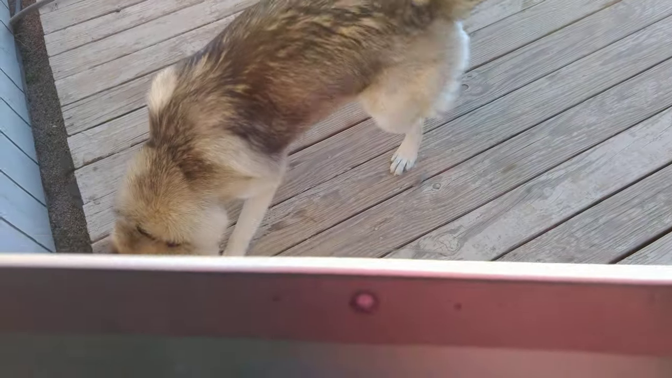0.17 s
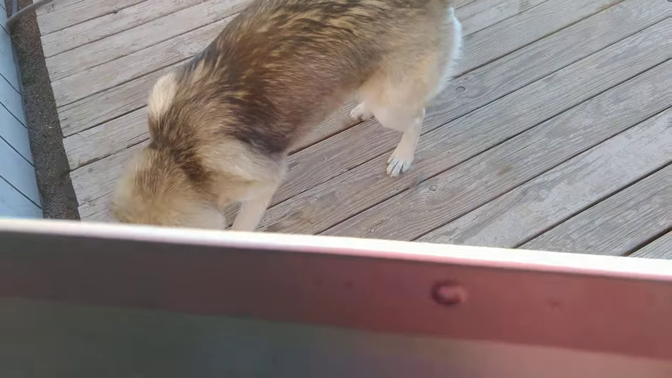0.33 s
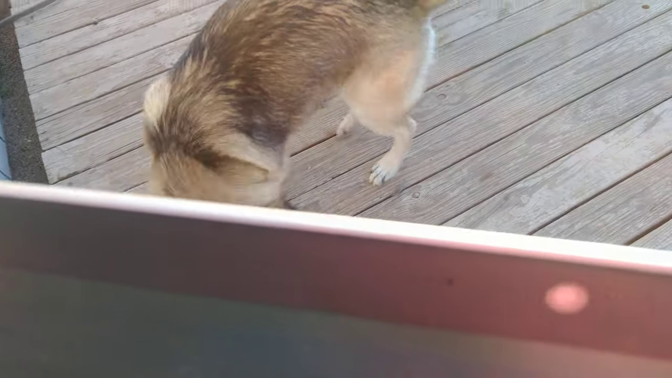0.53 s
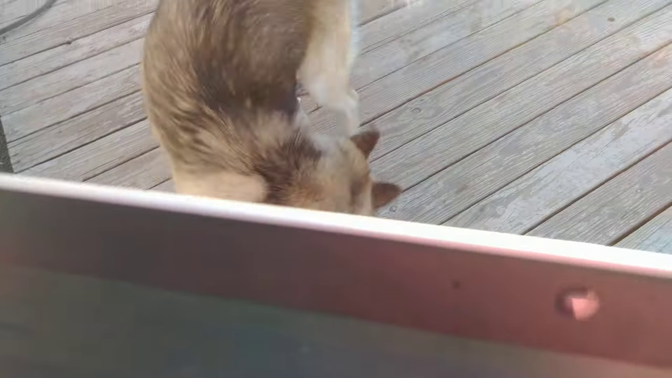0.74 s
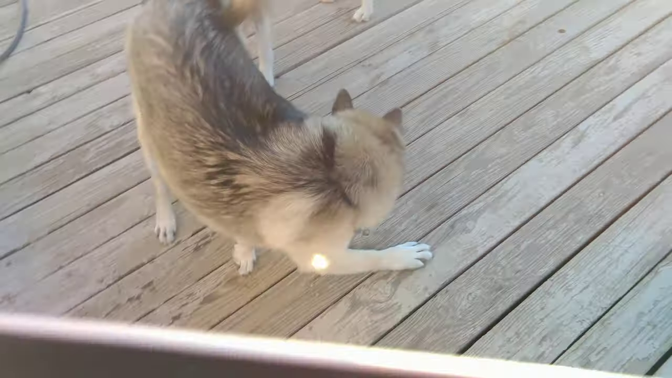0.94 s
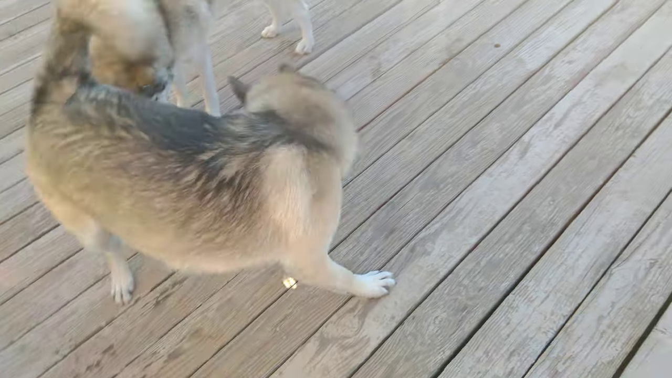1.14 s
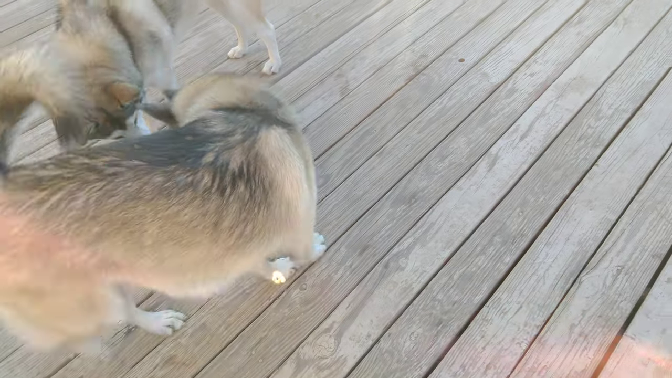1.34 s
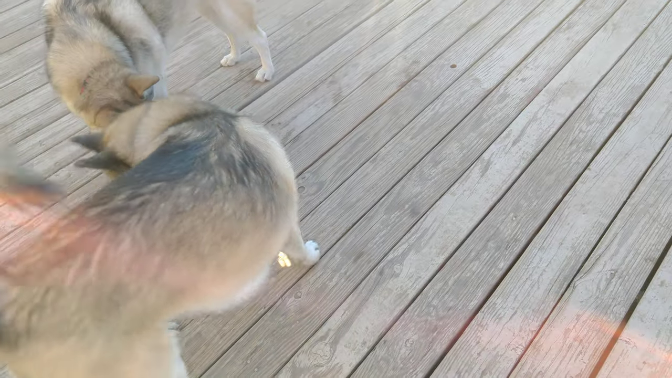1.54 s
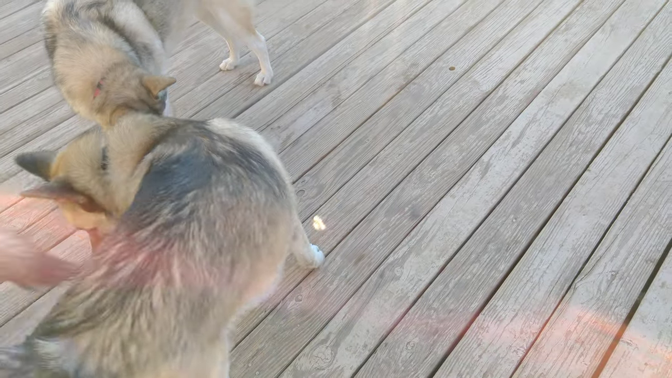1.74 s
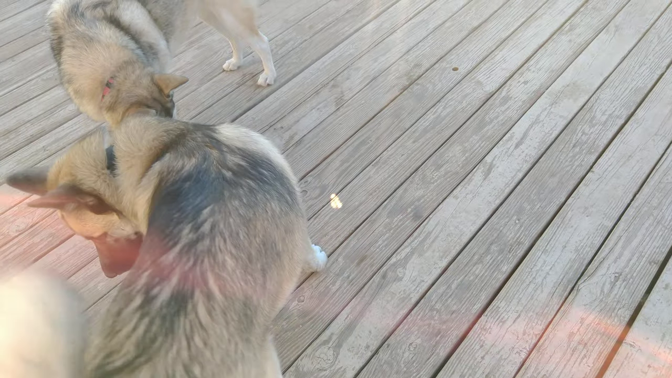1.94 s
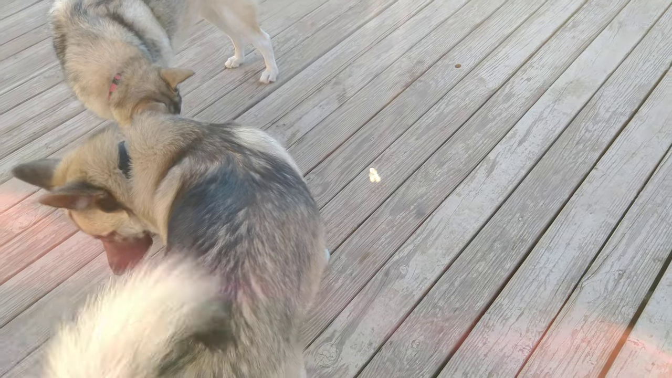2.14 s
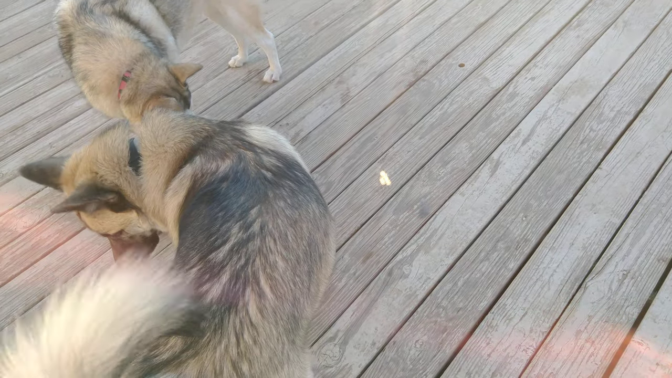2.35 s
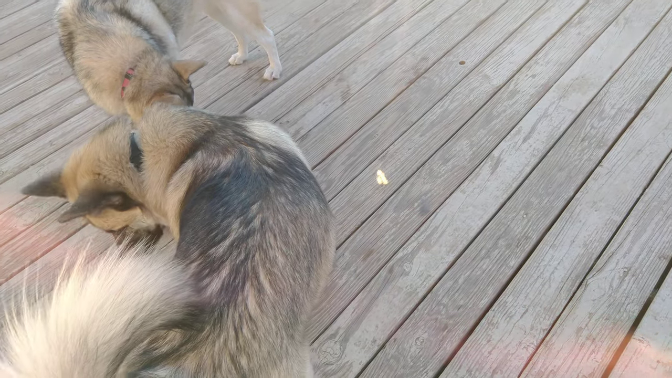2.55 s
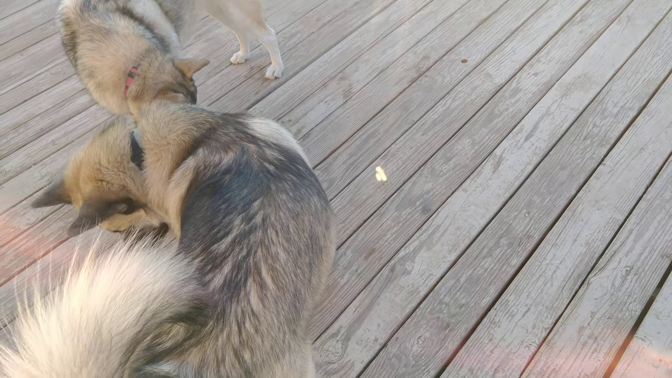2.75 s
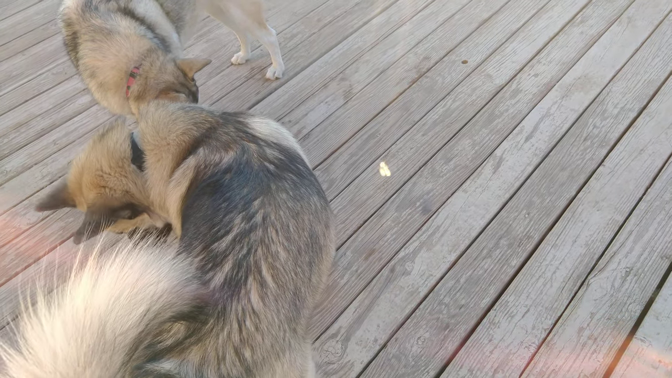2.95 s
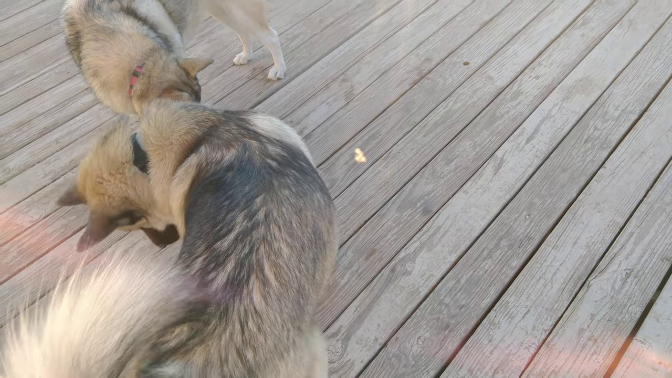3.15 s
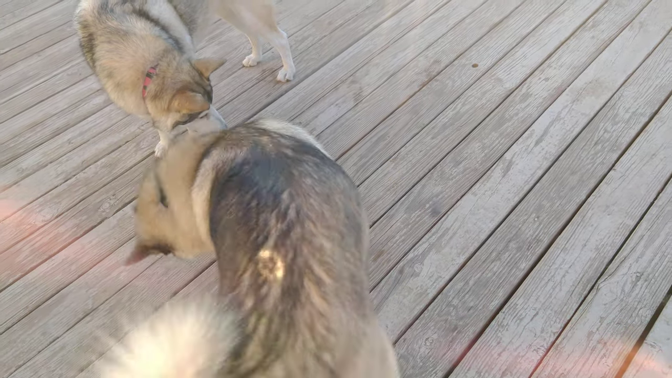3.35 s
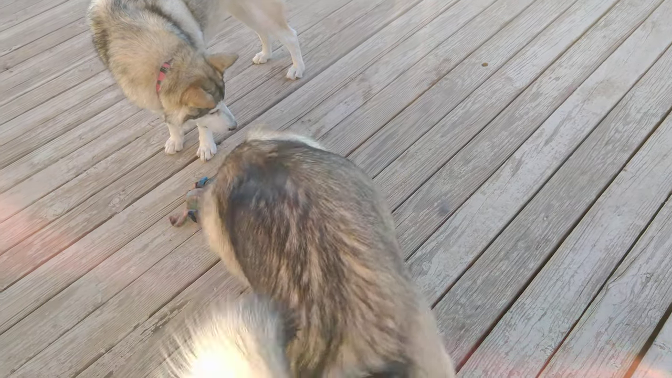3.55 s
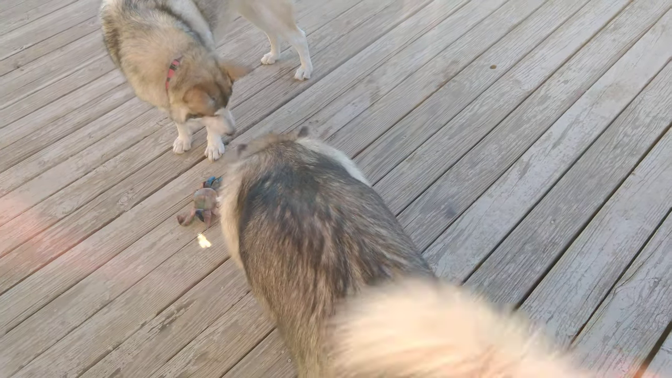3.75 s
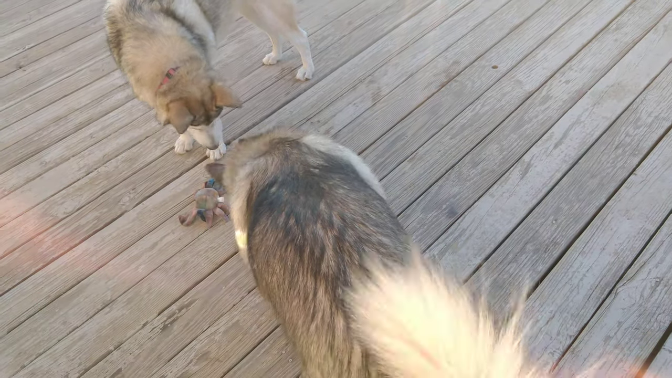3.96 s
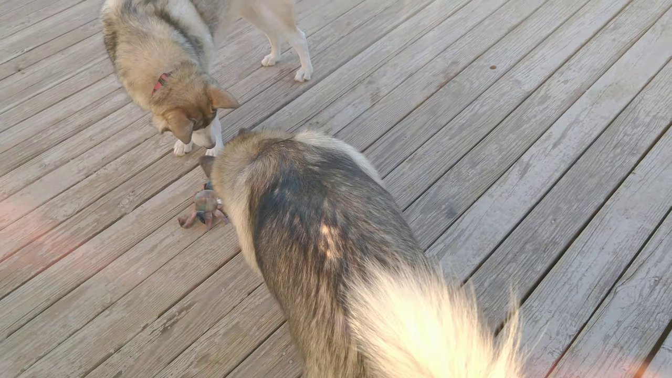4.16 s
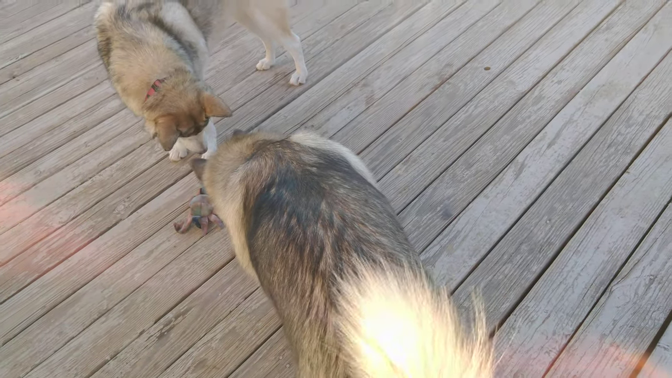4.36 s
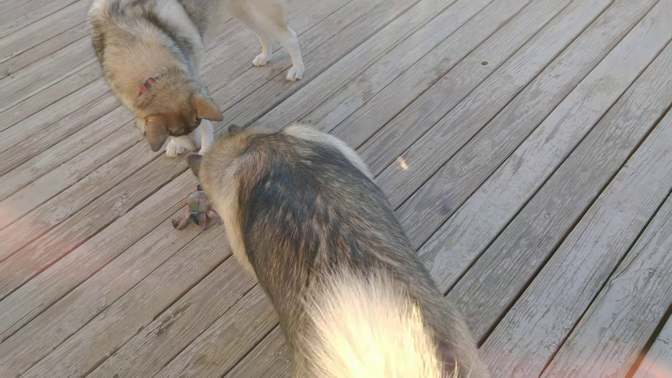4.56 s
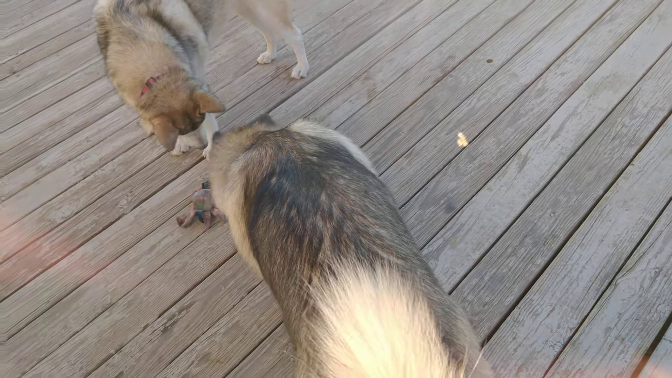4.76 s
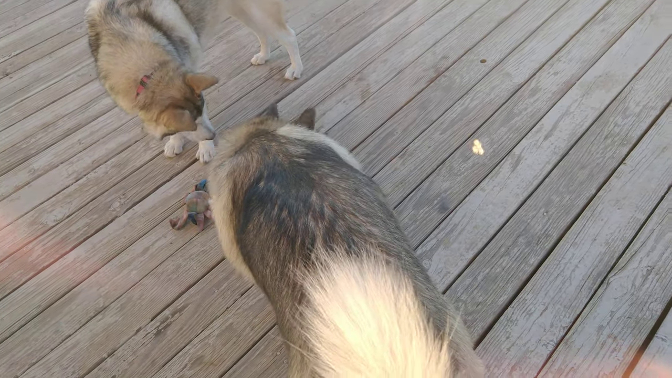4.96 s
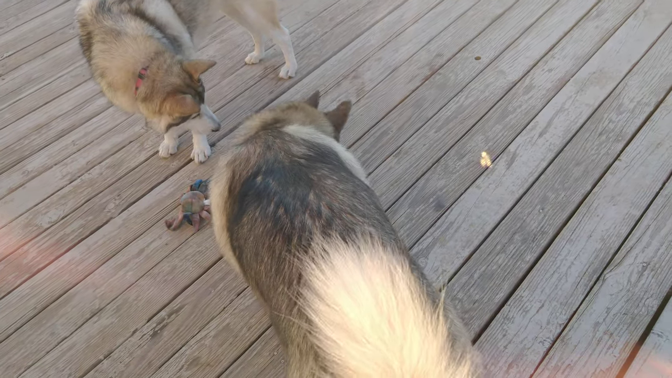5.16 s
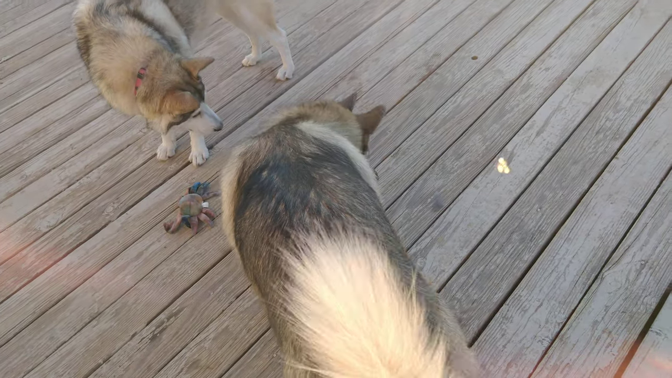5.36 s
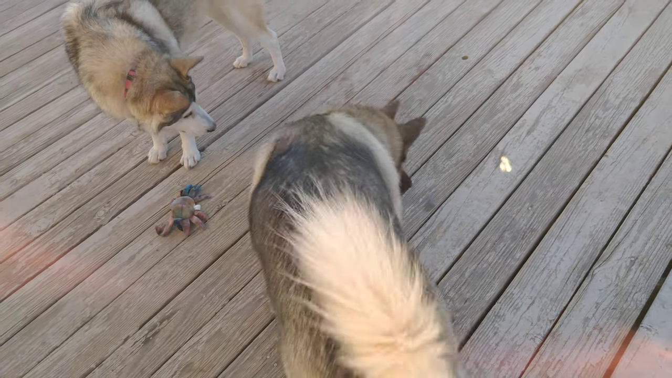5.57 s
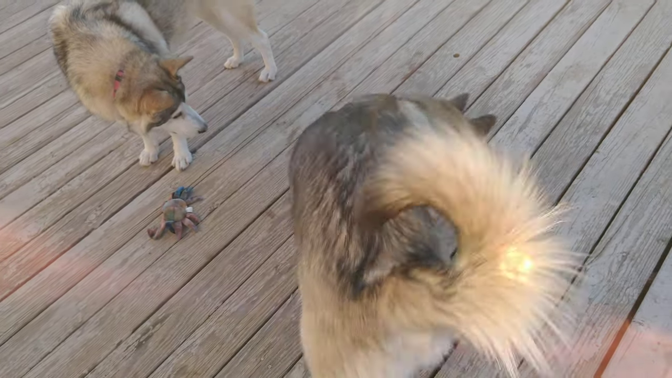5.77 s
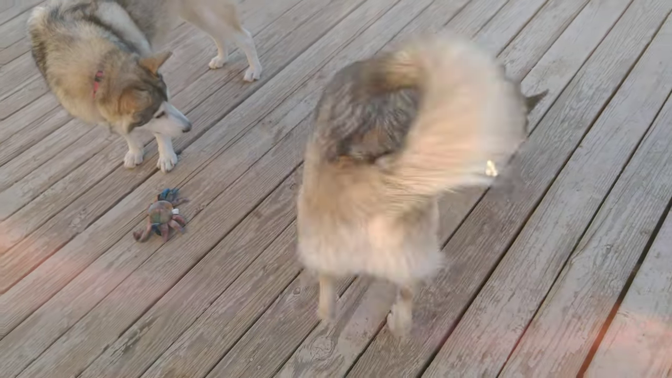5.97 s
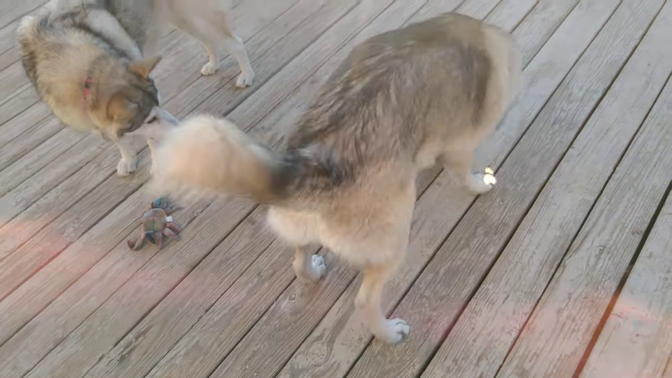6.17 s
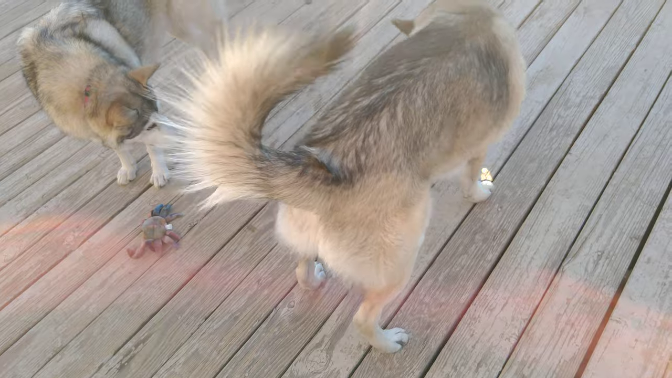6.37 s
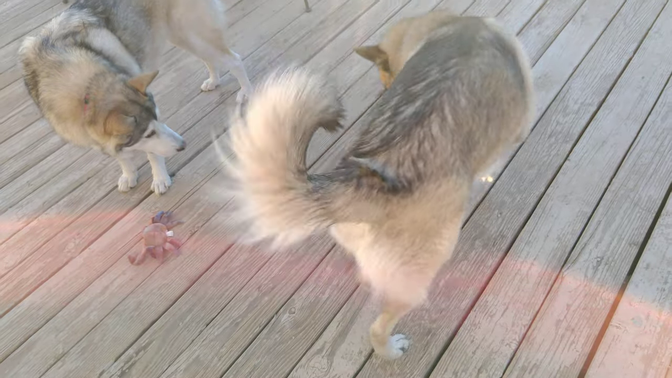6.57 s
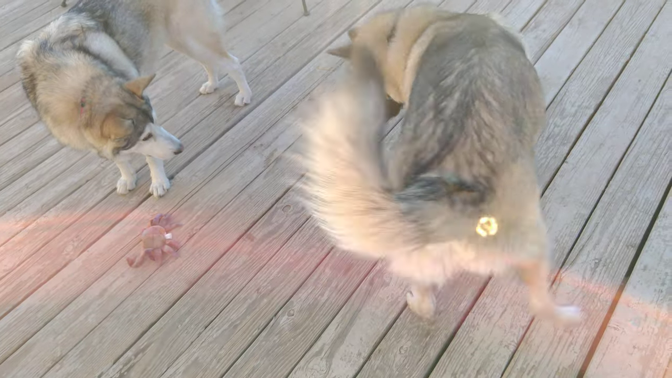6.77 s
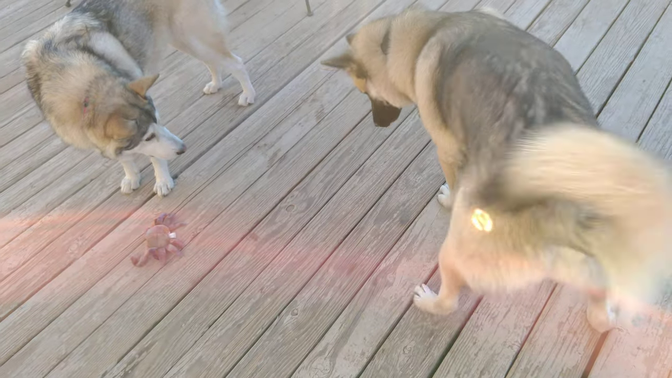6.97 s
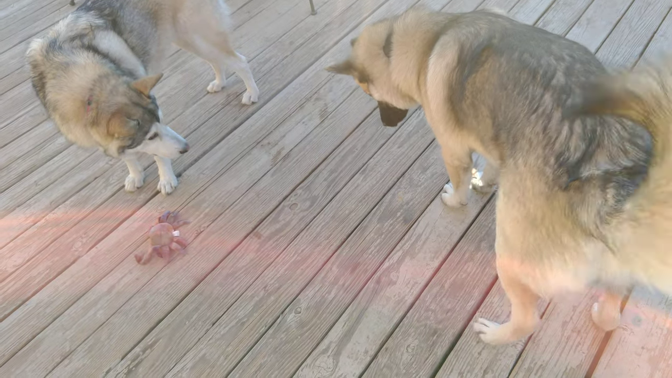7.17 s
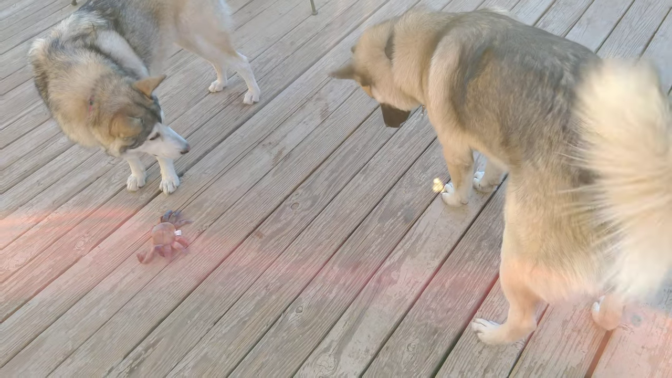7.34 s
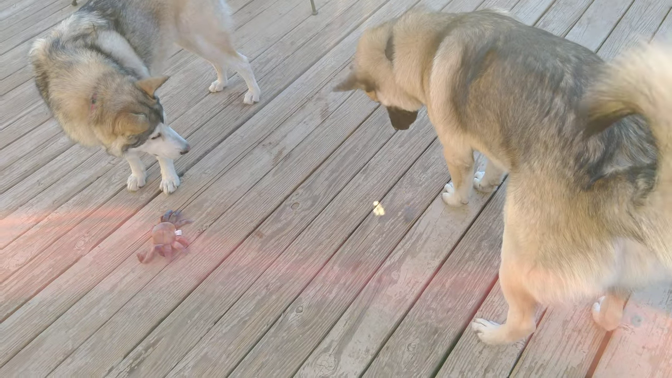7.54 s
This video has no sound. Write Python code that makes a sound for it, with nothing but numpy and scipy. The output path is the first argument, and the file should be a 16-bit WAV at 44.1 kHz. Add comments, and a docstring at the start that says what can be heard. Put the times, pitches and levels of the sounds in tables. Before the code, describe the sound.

Dogs move about on a wooden deck outdoors, close below the microphone, over a faint, steady distant rumble and hiss. From the start until about 2 seconds, paws thump softly on the boards, pads scuff and claws tick, while metal collar tags give thin, bright clinks, clearest around 0.8 and 1.1 seconds. A very faint bird whistle falls and wavers just before 2 seconds. After a lull, a few steps return at about 3.4 seconds, with tag clinks near 3.9 and a sharper one at 4.2. Two thin, very faint whimpers from a far-off dog rise and fall at about 4.2 and 4.9 seconds. It stays quiet until about 5.9 seconds, when a busy run of thumps, scuffs, claw clicks and jingling begins. One more clear clink comes near 6.6, and the steps fade out by about 7.3 seconds.

```python
"""Dogs on a wooden deck

Outdoors, a phone's two microphone ports above the boards. Close below, dogs pad about: paws thump the planks,
pads scuff over the grain, claws tick and now and then tink clearly, two metal collar tags clink. A bird
whistles once and a dog whimpers far off, both gliding tones, over distant rumble."""
import sys
import numpy as np
from scipy import signal
from scipy.fft import rfft, irfft
from scipy.io import wavfile
from scipy.ndimage import uniform_filter1d

SR = 44100
rng = np.random.default_rng(int(sys.argv[2]) if len(sys.argv) > 2 else 0)


def unload_audio(sound):
    """Save the sound as a 16-bit wav file, at the path given as the first command line argument."""
    columns = np.transpose(np.atleast_2d(sound))
    # keep every value between -1 and 1, then stretch to whole-number steps
    steps = np.round(np.clip(columns, -1, 1) * 32767)
    wavfile.write(sys.argv[1], SR, steps.astype(np.int16))


N = 335601
T = np.arange(N) / SR

# distant rumble and hiss: (frequency [Hz], level [dB])
AIR_SPECTRUM = [(18, -54), (30, -7.5), (109, -1.5), (157, -1), (184, -6), (221, -2.5), (266, -4),
                (303, -8.5), (584, -8), (1390, -19.5), (1500, -25), (8080, -35), (16000, -39.5)]
# air common to both ports: (frequency [Hz], share [0-1])
AIR_COHERENCE = [(100, .7), (430, .6), (1200, .85), (1700, .4), (2400, .5), (4000, .2)]
# pad drags: (time [s], length [s], hiss level [dB], fade over the length [dB], rumble re hiss [dB])
PAD_DRAGS = [(0, 0.15, -59.5, 33, 17.5), (0.155, 0.13, -52, 3.5, 1), (0.28, 0.2, -64, 13.5, 1.5),
             (.632, 0.061, -41, 3.5, -7.5), (0.703, 0.075, -43, 9, 2), (0.773, 0.093, -61.5, 13, 12),
             (1.03, .04, -48, 2.5, 13.5), (1.084, 0.095, -51, 31, 13.5), (1.198, 0.16, -74.5, 2, 3),
             (1.456, 0.1, -67.5, 14, 11), (1.629, 0.11, -56.5, 29, 15), (1.869, 0.16, -60, 23, 5.5),
             (3.294, 0.058, -75.5, -4, -15), (3.43, 0.21, -63.5, 26, 14), (3.931, 0.088, -73, 8, 18),
             (4.246, 0.13, -67, 10.5, 11.5), (5.935, 0.076, -56, 9, 18), (6.024, 0.096, -51.5, 11.5, 5.5),
             (6.139, 0.14, -59.5, 21.5, 16.5), (6.54, 0.089, -63, 16.5, 16.5),
             (6.638, 0.053, -66.5, -3, 12), (6.703, 0.15, -64.5, 17, 10.5), (7.108, 0.038, -71, -2.5, -1)]
# hiss of pad on wood: (frequency [Hz], level [dB])
PAD_SPECTRUM = [(400, -8.5), (1300, -10), (2470, -10.5), (3690, -7.5), (4800, -13), (6950, -12.5),
                (10000, -20), (13500, -18.5), (16000, -37)]
# modes of the long boards: (frequency [Hz], width [Hz], level [dB])
BOARD_MODES = [(103.6, 64, -9), (174.8, 36, 2), (238, 130, 2.5), (323, 37, -11)]
# modes of the plank underfoot: (frequency [Hz], width [Hz], level [dB])
PLANK_MODES = [(338, 24, -6), (537.6, 38, 0.5), (649, 53, 3.5), (721, 19, 2), (922, 250, -3.5),
               (1115, 110, -8.5), (1570, 620, -9.5)]
# tag hits: (time [s], first tag [dB], second tag [dB], spot [-1 centre, 1 rim], leftward pan [dB])
TAG_HITS = [(0.0024, -53, -77, 1, 0), (0.174, -57, -47.5, -0.55, 7), (0.2462, -54, -44, 0.92, -1),
            (0.605, -57, -60, .6, 6), (0.755, -37.5, -39.5, 0.6, 7), (0.823, -56, -63, 0.58, 12),
            (1.0824, -38.5, -47, 0.038, 4), (1.509, -71, -65, -0.32, 7), (1.8684, -67, -53, -0.3, -3),
            (1.9844, -67, -66, 0.08, 1), (3.902, -60, -59, .8, 19), (3.9379, -45.5, -45, -0.54, 7.5),
            (4.033, -68, -83, -.3, 6), (4.2338, -32.5, -39, -0.22, 7.5), (4.306, -59.5, -53.5, 0.98, 32),
            (4.366, -76, -66, -0.35, 6), (4.562, -81, -90, -0.91, 5), (5.979, -44.5, -51, -0.7, 3),
            (5.989, -70, -48, 0, 0.1), (6.0033, -66, -41, -0.9, -3), (6.028, -72, -47, 0, 0.1),
            (6.0604, -54, -41, 0.38, -1), (6.099, -75, -61, -0.1, -2), (6.1906, -49.5, -57, 0.27, 3),
            (6.227, -59, -63, 1, 3), (6.351, -60, -69, -0.19, 0), (6.5064, -89, -71, 0, 1),
            (6.6485, -37, -45, -0.047, 8), (6.8374, -85, -73.5, -.5, 0), (7.0744, -92, -78, 0, 28)]
# tag modes: (frequency [Hz], t60 [s], left lead [rad], pan weight [ratio], tag [index])
TAG_MODES = [(8738, .1, .7, 1.2, 0), (9255, .045, -2, 1, 0), (10760, .04, -.4, .2, 1),
             (11345, .13, -.8, .2, 0), (5800, .022, 0, .8, 1), (13850, .025, 0, .2, 1)]
# drive of each tag mode: (level struck midway [dB], gain towards the rim [dB])
TAG_DRIVE = [(-3.5, -13), (-2, -3), (6.3, -0.2), (-6.2, 4.5), (-1, 0), (-8, -7)]
# rattle of metal on metal: (frequency [Hz], width [Hz], level [dB])
CLATTER_MODES = [(10700, 8700, 28), (14000, 1500, 1), (5740, 300, -35)]
# paw falls: (time [s], board level [dB], knock re boards [dB], push t60 [s], span ring [Hz])
PAW_FALLS = [(0.004, -27, -21, 0.13, 245), (0.165, -29, -3.5, 0.12, 248), (0.633, -41, -7, 0.41, 264),
             (0.698, -45.5, 2, 0.48, 173), (0.743, -32, -8, 0.16, 220), (0.978, -47.5, -9, 0.21, 232),
             (1.021, -32.5, -10, 0.32, 113), (1.08, -34, -18, 0.22, 170), (1.214, -46.5, -16.5, 0.3, 170),
             (1.366, -39, -8.5, 0.16, 188), (1.459, -42, -7.5, 0.16, 169), (1.627, -32, -15, 0.25, 198),
             (1.641, -39, -5.5, 0.095, 333), (1.872, -53.5, 2.5, 0.17, 184), (1.924, -59, 3, 0.14, 200),
             (2.058, -51.5, -12, 0.38, 88.5), (3.438, -37.5, -11, 0.11, 205),
             (3.481, -34.5, -18, 0.17, 123), (3.648, -45.5, -9, 0.45, 164), (3.93, -50.5, -8, 0.37, 108),
             (4.246, -43.5, -10.5, 0.11, 84), (4.299, -51, -3, 0.31, 294), (5.932, -38, -16, 0.19, 154),
             (5.977, -31.5, 7.5, 0.23, 189), (6.065, -48.5, 7.5, 0.25, 287),
             (6.152, -25.5, -12.5, 0.19, 134), (6.199, -31, -35, 0.1, 237), (6.234, -35, -41, 0.16, 170),
             (6.542, -35.5, -15, 0.19, 244), (6.643, -52.5, 1, 0.92, 86), (6.724, -37, -12, 0.14, 126),
             (6.888, -38, -9.5, 0.26, 170), (7.224, -55.5, -9, 0.34, 150)]
# claws meeting wood: (time [s], level [dB], t60 [s], ring [Hz])
CLAW_TICKS = [(0.0613, -58, 0.21, 3970), (0.1651, -36, 0.034, 4400), (0.563, -51.5, 0.091, 5860),
              (0.604, -55.5, 0.15, 5700), (0.628, -50, 0.03, 3470), (0.647, -39, 0.075, 3130),
              (0.7252, -36, 0.045, 3680), (0.8195, -58.5, 0.15, 5500), (1.0243, -54, 0.096, 3760),
              (1.083, -40, 0.062, 4400), (1.206, -60, 0.04, 6100), (1.3654, -51.5, 0.061, 4060),
              (1.462, -52, 0.025, 6200), (1.626, -47.5, 0.046, 3820), (1.758, -63.5, 0.11, 4060),
              (1.8724, -44.5, 0.032, 3700), (1.985, -58, 0.022, 4140), (2.064, -54.5, 0.048, 3170),
              (2.0912, -63.5, 0.044, 3910), (3.4334, -51.5, 0.15, 3300), (3.5136, -57, 0.033, 4180),
              (3.6484, -57.5, 0.043, 3320), (3.672, -61, 0.079, 3250), (3.8272, -65.5, 0.03, 3900),
              (3.902, -60, 0.085, 5400), (3.9309, -57, 0.16, 5440), (4.2323, -47.5, 0.022, 6000),
              (4.3667, -65, 0.048, 5700), (5.9513, -44.5, 0.11, 3840), (5.9734, -48, 0.037, 3260),
              (6.0682, -31, 0.04, 3480), (6.1356, -48.5, 0.14, 3440), (6.1903, -58, 0.037, 2800),
              (6.267, -64, 0.09, 3330), (6.546, -53, 0.028, 3300), (6.5983, -61, 0.057, 3450),
              (6.6477, -51, 0.12, 6200), (6.7222, -44.5, 0.076, 3870), (6.8914, -62.5, 0.085, 3540),
              (6.9485, -58, 0.13, 5570), (6.9913, -66, 0.073, 5600), (7.109, -66, 0.033, 4040),
              (7.226, -59.5, 0.12, 4500)]
# colour of a tick: (frequency [Hz], level [dB])
CLAW_SPECTRUM = [(1500, 6.5), (2500, -1), (4000, -0.5), (6500, -4.5), (9000, -7.5)]
# further claw ticks, each a lone clear tink: (time [s], level [dB], pitch [Hz])
CLAW_TINKS = [(.897, -66.5, 5640), (4.015, -69, 4050), (4.025, -67.5, 3370), (4.262, -59, 4260),
              (4.842, -67, 4270), (5.506, -72, 3100), (6.403, -69, 3120)]
# the bird's glide: (time [s], pitch [Hz], level [dB])
BIRD_GLIDE = [(1.64, 4900, -90), (1.67, 4700, -82), (1.72, 4350, -76), (1.77, 4150, -79), (1.83, 4080, -94),
              (1.88, 4170, -72), (1.93, 4230, -84), (1.972, 3960, -73), (1.99, 4120, -74),
              (2.01, 4350, -92)]
# one glide per whimper: (time [s], pitch [Hz], level [dB])
WHIMPER_GLIDES = [
    [(4.11, 685, -74), (4.14, 777, -68), (4.19, 959, -65), (4.22, 961, -74), (4.26, 843, -54.5),
     (4.29, 800, -67), (4.31, 770, -75)],
    [(4.845, 687, -73), (4.89, 835, -67.5), (4.903, 1150, -67), (4.93, 1140, -69), (4.95, 870, -73)],
]
# balance of the ports: (frequency [Hz], left minus right [dB])
PORT_BALANCE = [(60, 9.5), (380, 3), (1290, 2.5), (2380, 0.5), (4400, 0), (8120, 10.5), (15000, -4.5)]


def undb(db):
    """Decibels to gain."""
    return 10 ** (np.asarray(db) / 20)


def on_log(hz, table):
    """Read (Hz, value) points on a log axis."""
    f, v = np.transpose(table)
    return np.interp(np.log(hz + 1), np.log(f), v)


def coloured(x, response):
    """Filter by a function of frequency; rms 1."""
    size = x.shape[-1]
    y = irfft(rfft(x) * response(np.fft.rfftfreq(size, 1 / SR)), size)
    return y / np.sqrt(np.mean(y ** 2))


def resonant(modes):
    """Response of a body with (Hz, width, dB) modes."""
    return lambda f: sum(undb(db) * 1j * w * f / (hz ** 2 - f ** 2 + 1j * w * f) for hz, w, db in modes)


def padded(modes, corner_hz):
    """Response of wood under a soft pad, which excites little treble."""
    return lambda f: resonant(modes)(f) / (1 + 1j * f / corner_hz) ** 2


def share(a, b, alike):
    """Spread two noises over left and right, with the share `alike` in common."""
    return np.sqrt(1 + alike) * a + np.sqrt(1 - alike) * b * np.array([[1], [-1]])


def port_noise(size, alike):
    """White noise at both ports, partly shared."""
    return share(*rng.standard_normal((2, size)), alike)


def burst(t60, rise_s, response, alike, grain_db=0, blow=0):
    """A dying push of noise through a body, with optional grain and blow; envelope peak 1."""
    t = np.arange(16384) / SR
    grains = undb(grain_db * rng.exponential(size=256).repeat(64))
    push = port_noise(len(t), alike) * grains * (1 - np.exp(-t / rise_s)) * 1000 ** (-t / max(t60, .005))
    pulse = blow * np.sin(np.pi * np.clip(t / rise_s, 0, 1))
    y = coloured(push + pulse, response)
    power = uniform_filter1d(np.mean(y ** 2, axis=0), size=128)
    return y / np.sqrt(2 * power.max())


def glide(points, octave_db):
    """A near-pure gliding tone with a weak octave."""
    s, hz, db = np.transpose(points)
    phase = 2 * np.pi * np.cumsum(np.interp(T, s, hz)) / SR
    gain = uniform_filter1d(np.interp(T, s, undb(db), left=0, right=0), size=600)
    return np.sqrt(2) * gain * (np.sin(phase) + undb(octave_db) * np.sin(2 * phase))


def add(out, s, x):
    """Mix x in from time s."""
    i = int(s * SR)
    out[:, i:i + x.shape[-1]] += x[..., :N - i]


def distant_air(level_db=-65.5):
    """Far-off rumble, largely alike at both ports, under smooth hiss."""
    alike = on_log(np.fft.rfftfreq(N, 1 / SR), AIR_COHERENCE)
    noise = irfft(share(*rfft(rng.standard_normal((2, N))), alike), N)
    return undb(level_db) * coloured(noise, lambda f: undb(on_log(f, AIR_SPECTRUM)))


def pad_scuffs(attack_s=0.028, release_s=0.023):
    """Dense, uneven slips hiss, each patch of grain with its own colour, and set the boards rumbling."""
    slips = port_noise(N, alike=0.87) * undb(0.86 * rng.exponential(size=N // 40 + 1).repeat(40)[:N])
    cells = signal.stft(slips, nperseg=128)[2]
    _, bands, frames = cells.shape
    patch_db = 3 * rng.standard_normal((bands // 4 + 1, frames // 3 + 1))
    patch_db = patch_db.repeat(4, axis=0).repeat(3, axis=1)[:bands, :frames]
    slips = signal.istft(cells * undb(patch_db), nperseg=128)[1][:, :N]
    hiss = coloured(slips, lambda f: undb(on_log(f, PAD_SPECTRUM)))
    rumble = coloured(port_noise(N, alike=1), padded(BOARD_MODES + PLANK_MODES, corner_hz=450))
    out = np.zeros((2, N))
    for s, length, db, fade_db, rumble_db in PAD_DRAGS:
        attack = np.clip((T - s) / attack_s + .5, 0, 1)
        release = np.clip((s + length - T) / release_s + .5, 0, 1)
        gain = undb(db - fade_db * np.clip((T - s) / length, 0, 1))
        out += attack * release * gain * (hiss + undb(rumble_db) * rumble)
    return out


def collar_tags():
    """Thin metal discs ring on a few high modes; swinging and rubbing make each ring waver."""
    out, t = np.zeros((2, N)), np.arange(12000) / SR
    side = np.array([[.5], [-.5]])
    chance = rng.random((len(TAG_HITS), len(TAG_MODES), 4))
    for (s, *tag_db, spot, pan_db), draws in zip(TAG_HITS, chance):
        for (hz, t60, lead, pan_weight, tag), (mid_db, rim_db), draw in zip(TAG_MODES, TAG_DRIVE, draws):
            detune, swing_rate, swing_start, turn = draw
            db = tag_db[tag] + mid_db + rim_db * spot + side * pan_weight * pan_db
            swing = 0.047 * np.sin(2 * np.pi * ((20 + 40 * swing_rate) * t + swing_start))
            rub = 3.2 * uniform_filter1d(port_noise(len(t), alike=.3), size=150)
            fade = (1 - np.exp(-t / 0.0029)) * 1000 ** (-t / t60)
            phase = 2 * np.pi * hz * (1 + 0.0068 * (detune - .5)) * t
            port_phase = side * (lead + 3.5 * (turn - .5))  # the tag turns between blows
            add(out, s, undb(db) * (1 + swing + rub) * fade * np.sin(phase + port_phase))
    return out


def tag_clatter(relative_db=-5.5):
    """Each clink also rattles broadly where the metal meets, following the louder tag."""
    out = np.zeros((2, N))
    for s, first_db, second_db, _, _ in TAG_HITS:
        rattle = burst(t60=0.032, rise_s=0.00031, response=resonant(CLATTER_MODES),
                       alike=0.78, grain_db=2.5)
        add(out, s, undb(max(first_db, second_db) + relative_db) * rattle)
    return out


def paw_thumps(plank_hz=723.5, plank_spread=0.032):
    """Each fall shakes the long boards and knocks on one plank; no two planks ring quite alike."""
    out = np.zeros((2, N))
    rings_hz = plank_hz * (1 + plank_spread * rng.uniform(-0.83, 1, len(PAW_FALLS)))
    for (s, db, knock_db, t60, span_hz), ring_hz in zip(PAW_FALLS, rings_hz):
        boards = padded(BOARD_MODES + [(span_hz, 30, 6)], corner_hz=500)
        plank = padded(PLANK_MODES + [(ring_hz, 40, 5)], corner_hz=1600)
        thump = burst(t60, rise_s=0.0037, response=boards, alike=0.92, blow=0.37)
        knock = burst(0.61 * t60, rise_s=0.00029, response=plank, alike=1, blow=0.44)
        add(out, s, undb(db) * (thump + undb(knock_db) * knock))
    return out


def claw_ticks():
    """Short broad ticks, each with the ring of the spot the claw meets; higher rings are brighter."""
    out = np.zeros((2, N))
    for s, db, t60, hz in CLAW_TICKS:
        treble_db = -10 + 9 * np.log2(hz / 4000)
        colour = CLAW_SPECTRUM + [(14000, treble_db), (16000, treble_db - 15)]
        spot = resonant([(hz, 300, 6)])
        response = lambda f: undb(on_log(f, colour)) * f / (f + 1500) * (1 + spot(f))
        add(out, s, undb(db) * burst(t60, rise_s=0.0012, response=response, alike=0.59, grain_db=3))
    return out


def claw_tinks(rise_s=0.0015, t60=0.055):
    """Lone claw tinks, one short clear tone each."""
    out, t = np.zeros((2, N)), np.arange(6000) / SR
    fade = (1 - np.exp(-t / rise_s)) * 1000 ** (-t / t60)
    for s, db, hz in CLAW_TINKS:
        add(out, s, undb(db) * fade * np.sin(2 * np.pi * hz * t))
    return out


def bird():
    """One faint whistle that falls, then wavers."""
    return glide(BIRD_GLIDE, octave_db=-40)


def far_dog():
    """Two thin whimpers far from the microphone, each rising and falling."""
    return sum(glide(points, octave_db=-23) for points in WHIMPER_GLIDES)


def microphone_ports(x, lag_s=0.0004162, bass_lead_rad=1.1, bass_hz=693, dwell_rad=0.18):
    """Phase and level offsets between the phone's left and right ports."""
    hz = np.fft.rfftfreq(N, 1 / SR)
    lead = 2 * np.pi * hz * lag_s - np.pi + bass_lead_rad / (1 + (hz / bass_hz) ** 2)
    lead -= dwell_rad * np.sin(2 * lead)  # across frequency, the ports linger in and out of phase
    half = np.exp(.5j * lead) * undb(on_log(hz, PORT_BALANCE) / 2)
    return irfft(rfft(x) * np.array([half, 1 / half]), N)


def scene():
    """The deck from above; the ringing tags have their own direction and skip the port offsets."""
    near = paw_thumps() + claw_ticks() + pad_scuffs() + claw_tinks() + tag_clatter()
    background = distant_air() + bird() + far_dog()
    return microphone_ports(near + background) + collar_tags()


def record(dry, low_cut_hz=66, top_hz=15800):
    """The phone drops the deepest bass and cuts the top."""
    thinned = signal.sosfilt(signal.butter(4, low_cut_hz, "high", fs=SR, output="sos"), dry)
    return signal.sosfilt(signal.ellip(8, .2, 70, top_hz, fs=SR, output="sos"), thinned)


dry = scene()
out = record(dry)
unload_audio(out)
```